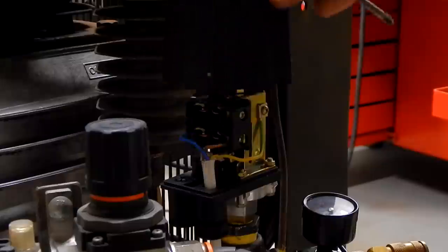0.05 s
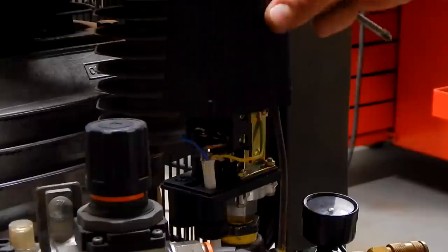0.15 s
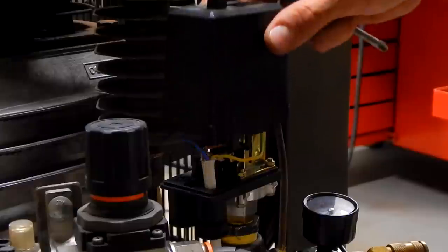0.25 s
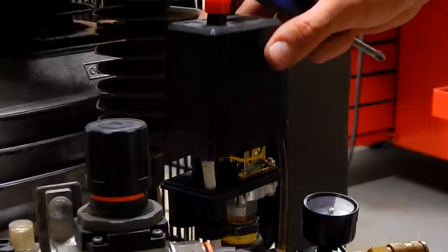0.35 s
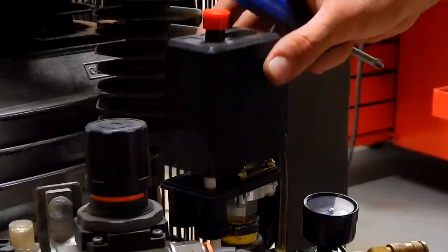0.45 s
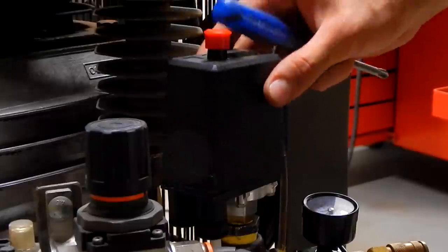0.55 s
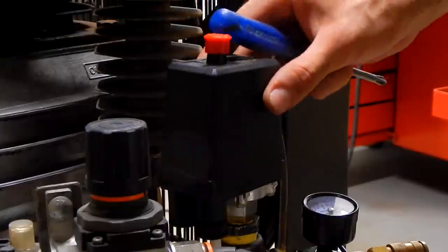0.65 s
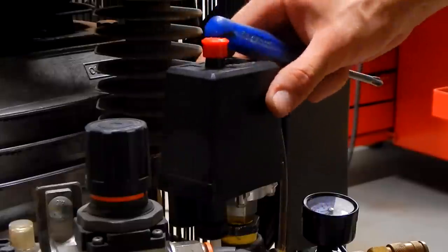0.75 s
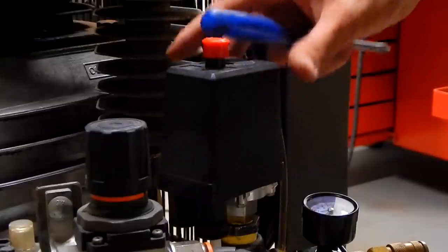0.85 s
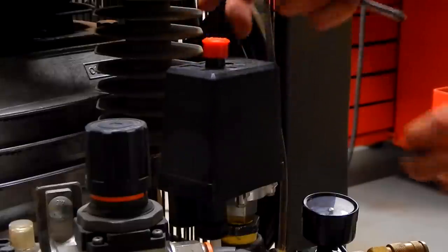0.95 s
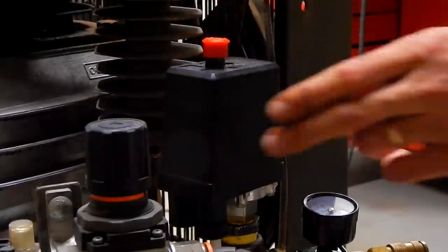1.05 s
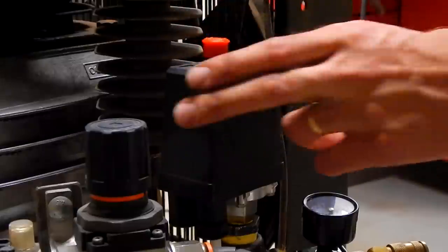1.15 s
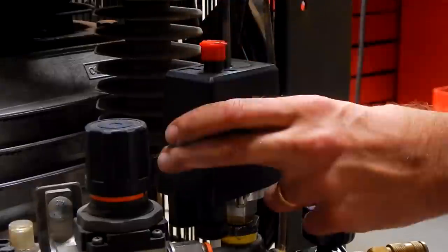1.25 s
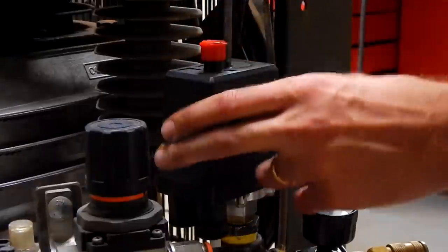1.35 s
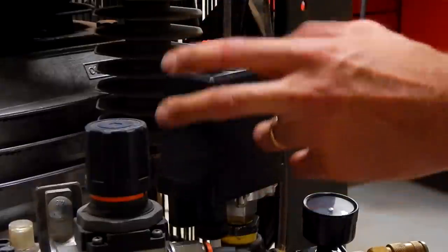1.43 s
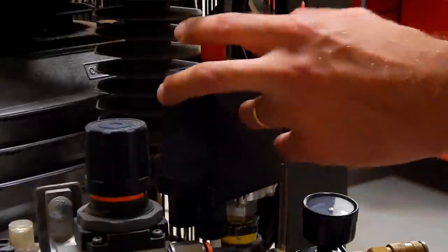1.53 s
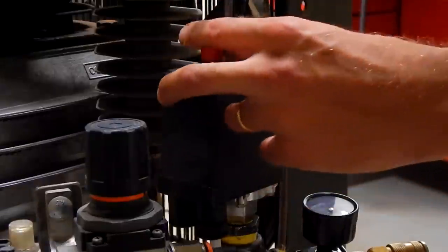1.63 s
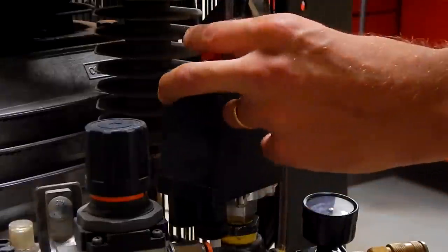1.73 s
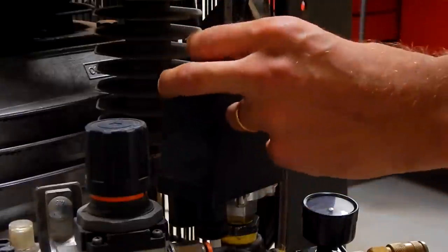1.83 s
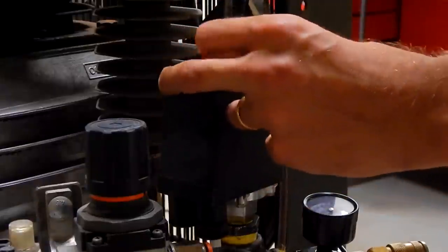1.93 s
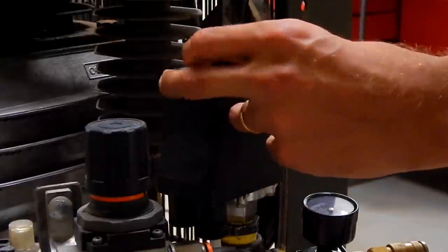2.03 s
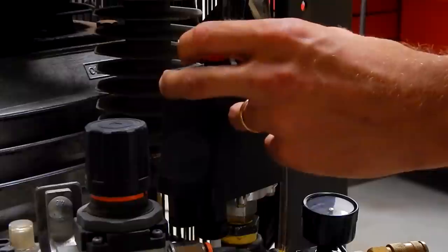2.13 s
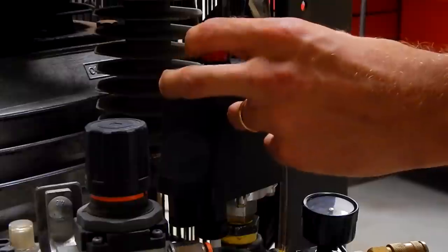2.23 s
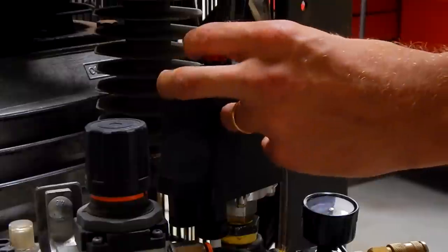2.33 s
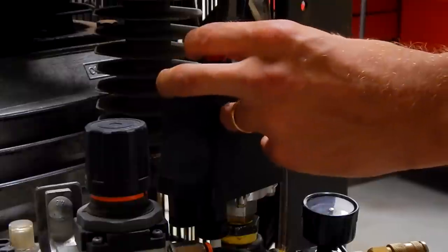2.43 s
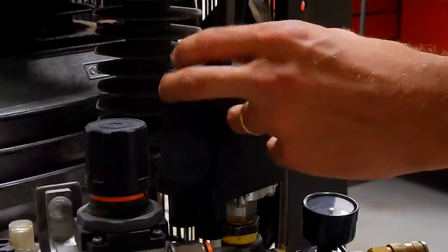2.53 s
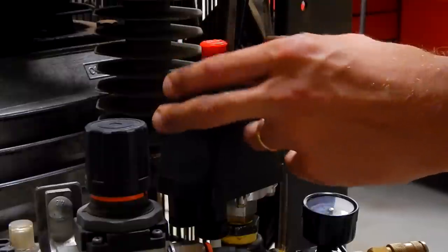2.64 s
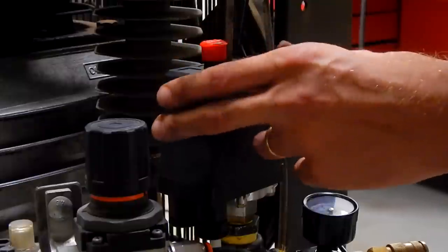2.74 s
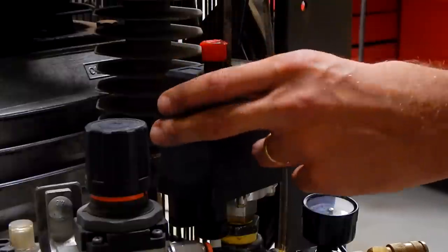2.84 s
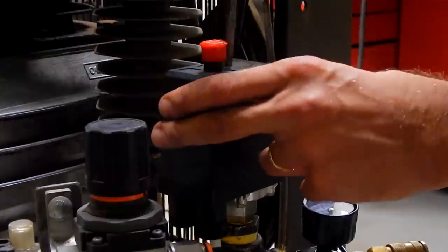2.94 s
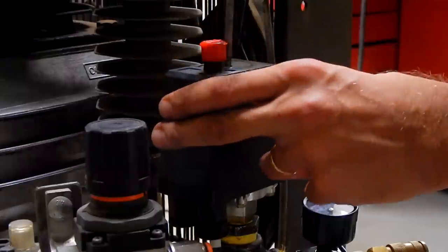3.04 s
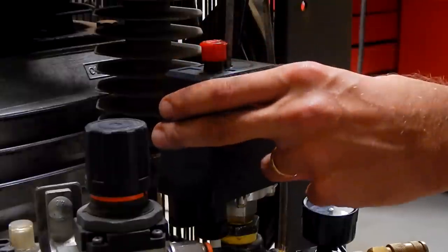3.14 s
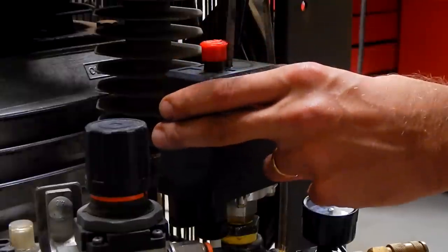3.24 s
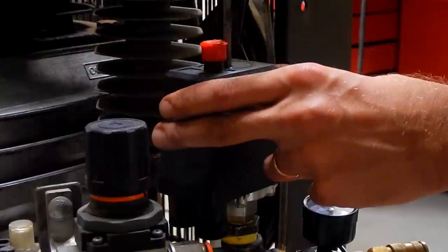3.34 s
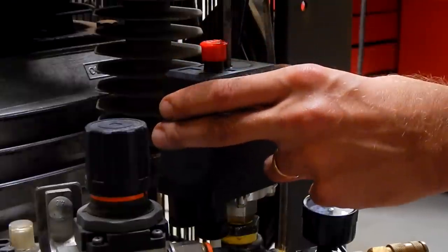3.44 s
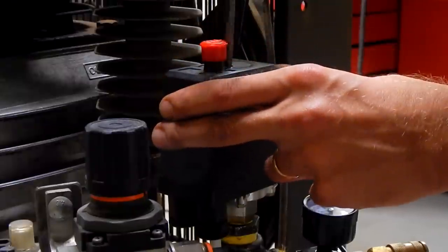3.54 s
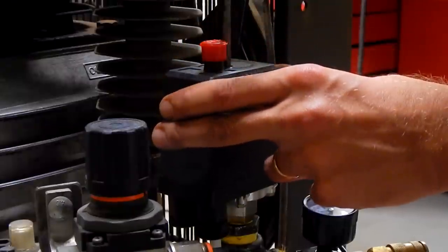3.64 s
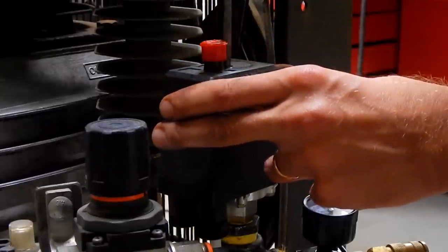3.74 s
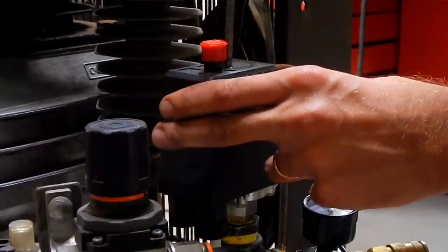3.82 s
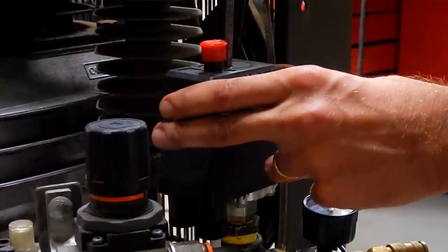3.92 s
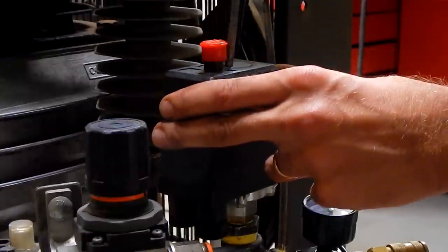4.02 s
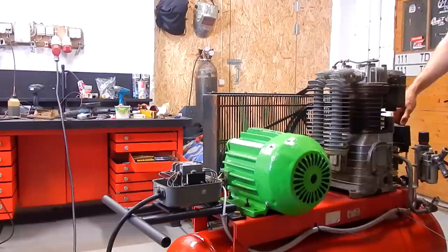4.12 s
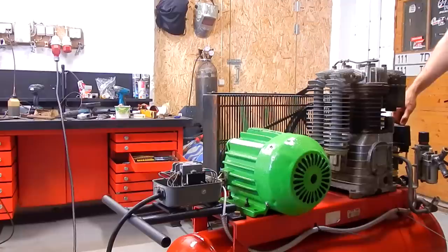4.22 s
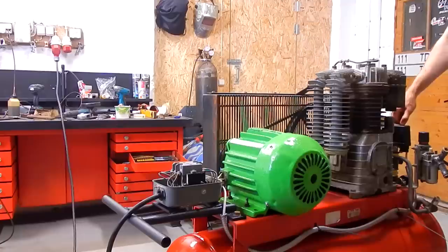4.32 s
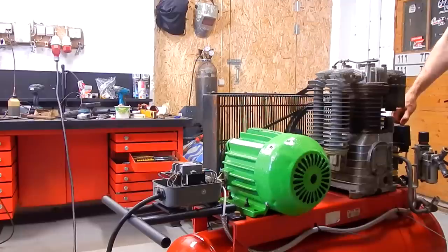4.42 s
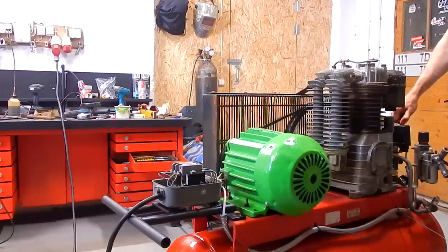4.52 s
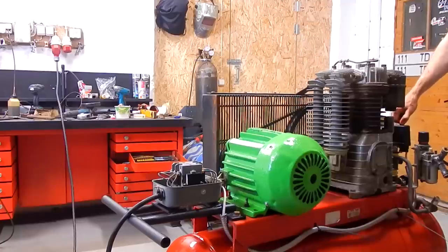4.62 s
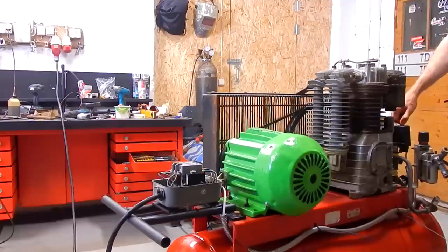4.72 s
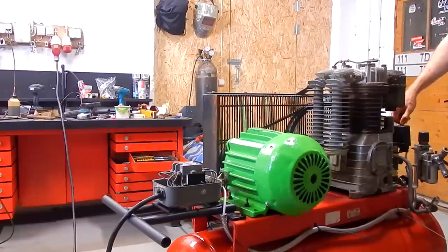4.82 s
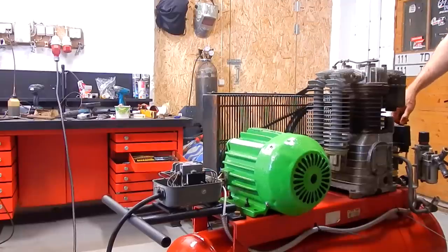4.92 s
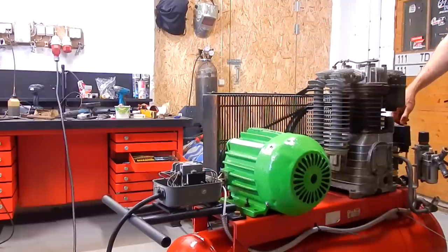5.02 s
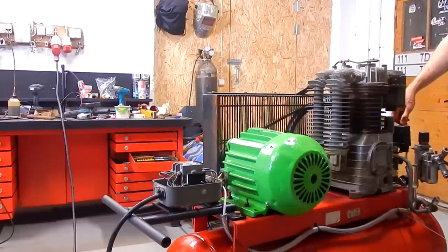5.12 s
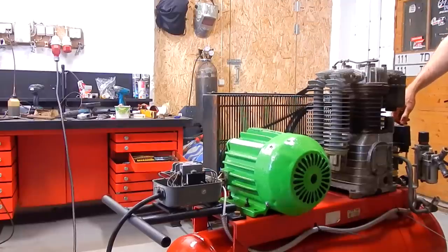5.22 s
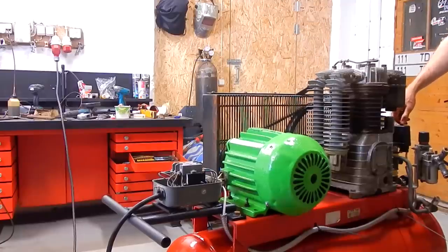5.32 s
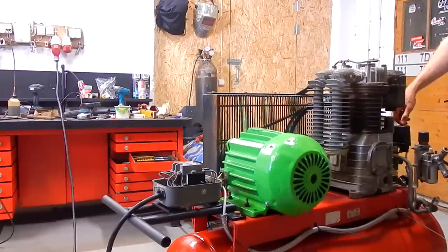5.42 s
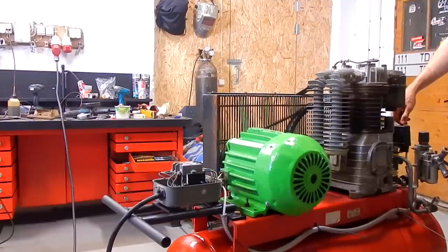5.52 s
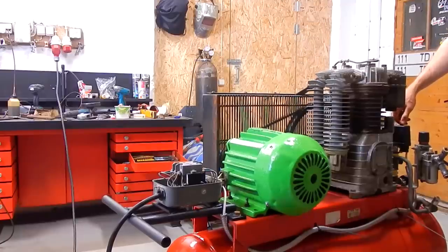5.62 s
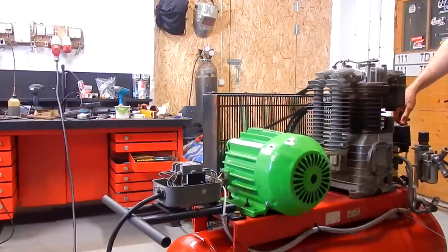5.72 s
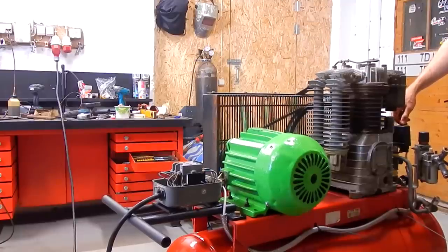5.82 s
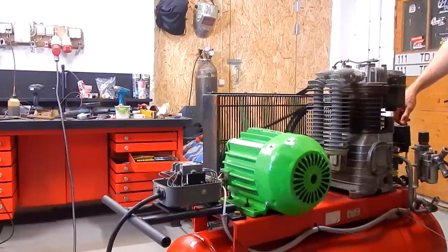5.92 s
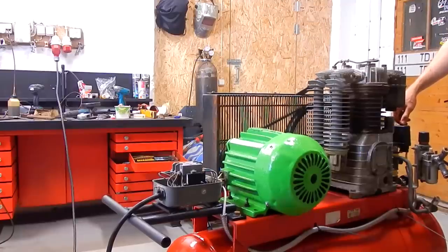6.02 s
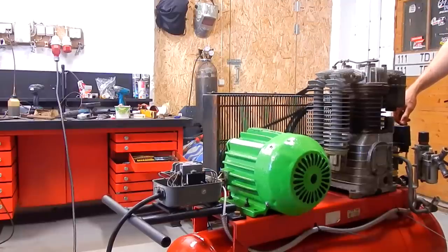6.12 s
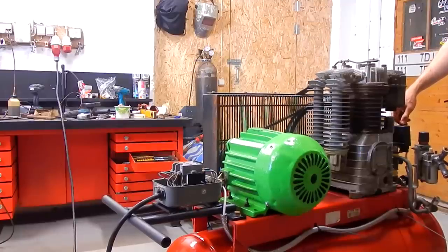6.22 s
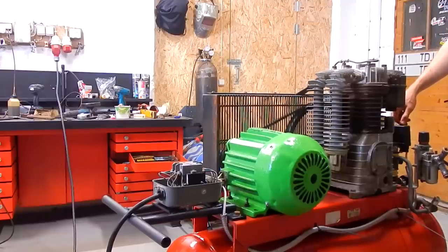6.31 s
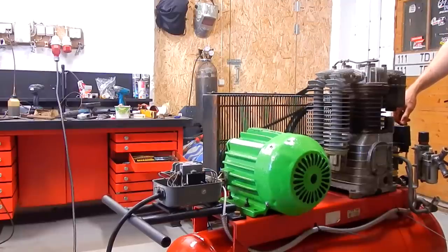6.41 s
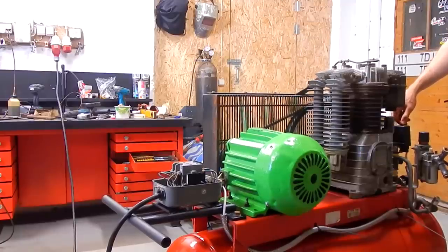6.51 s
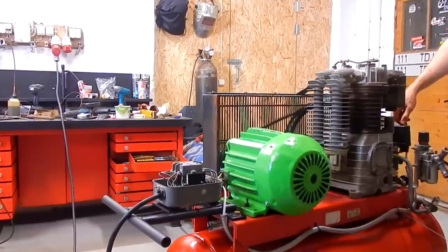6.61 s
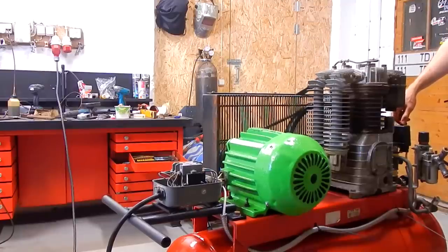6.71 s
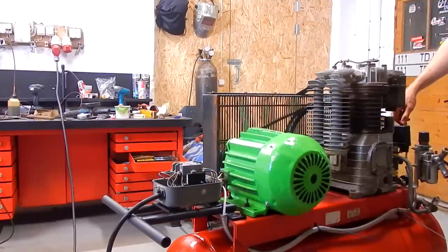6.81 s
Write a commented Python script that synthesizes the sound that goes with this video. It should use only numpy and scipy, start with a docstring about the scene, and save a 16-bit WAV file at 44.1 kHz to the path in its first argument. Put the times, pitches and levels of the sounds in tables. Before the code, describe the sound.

Over a faint workshop background, a hand fits a plastic cover close to the microphone, with a cluster of light taps and rubbing from about 0.3 to 0.9 seconds. Much fainter touches and skin rustle follow until about 4 seconds, with one slightly clearer tap at 3.6. At about 4.2 seconds a short, soft puff of air fades over a faint pipe hum. At 4.5 an electrical switch shuts with a sharp metallic clack and a short room echo. An electric air compressor immediately spins up with a rough, rising whine, a shudder, a brief belt chirp and a few quickening piston thuds. From about 5 seconds it runs at full speed in a loud, steady drone of throbbing tank, motor whine, rattling valves and bright rushing air, continuing to the end at around 7 seconds.

```python
"""A workshop. A hand fits a plastic cover on a pressure switch: rubbing skin and small taps ring the cover's
modes. Then the scene changes: further off, escaping air dies away over a humming pipe and a contactor clacks
shut. A belt-driven piston compressor spins up, shuddering and thudding, then settles into a drone of throbbing
tank, motor whine, valve rattle and rushing air. Two close microphone ports hear it."""
import sys
import numpy as np
from scipy import signal
from scipy.fft import rfft, irfft
from scipy.io import wavfile
from scipy.ndimage import uniform_filter1d

SR = 44100
rng = np.random.default_rng(int(sys.argv[2]) if len(sys.argv) > 2 else 0)


def unload_wav(signal):
    """Save mono or channel-first audio to the path in sys.argv[1] as 16-bit WAV at rate SR, clipped to [-1, 1]."""
    wavfile.write(
        sys.argv[1],
        SR,
        np.round(np.clip(np.atleast_2d(signal).T, -1, 1) * 32767).astype(np.int16),
    )


N = 302526
TIME = np.arange(N) / SR
SCENE_CHANGE_S, MOTOR_ON_S = 4.166, 4.5
STARTUP, RUN = slice(4 * SR, 5 * SR), slice(4 * SR, N)  # windows for the machine's sounds


def undb(db):
    """Decibels to amplitude."""
    return np.exp(np.asarray(db) * (np.log(10) / 20))

def unit(x, after_s=0):
    """Scale to rms 1 over the part after a given time."""
    return x / np.sqrt(np.mean(x[..., int(after_s * SR):] ** 2))

def curves(table, outside=None):
    """One automation curve per value column of (time, value, ..) rows."""
    times, *columns = np.transpose(table)
    after = outside if times[-1] < TIME[-SR // 10] else None
    return [np.interp(TIME, times, column, outside, after) for column in columns]

def on_bins(table):
    """Spread (frequency, value) rows over the spectrum's bins."""
    hz, value = np.transpose(table)
    return np.interp(np.log(np.fft.rfftfreq(N, 1 / SR) + 1), np.log(hz), value)

def ring(x, hz, t60):
    """One decaying mode as a turning pointer; its imaginary part is the sound."""
    pole = np.exp(2j * np.pi * hz / SR - np.log(1000) / (t60 * SR))
    return signal.lfilter([1], [1, -pole], x)

def walk(rate):
    """Smooth random drift, `rate` new values a second, spread near 1."""
    hold, coarse = int(SR / 16 / rate), TIME[::16]
    held = np.repeat(rng.standard_normal(len(coarse) // hold + 1), hold)
    smooth = uniform_filter1d(uniform_filter1d(held, hold), hold)
    return np.interp(TIME, coarse, unit(smooth[:len(coarse)]))

def low_cut(x, hz):
    """Roll off the bass, which small parts do not radiate."""
    return signal.sosfilt(signal.butter(3, hz, "high", fs=SR, output="sos"), x)

# How alike the two ports sound: (frequency [Hz], correlation)
PORT_LIKENESS = [(60, 1), (130, 0.58), (290, 0.87), (640, 0.93), (1410, 0.56), (3100, 0.2), (6820, 0.066),
                 (15000, -0.07)]
def noise(colour, loop=0., loop_share=0.):
    """Coloured stereo noise, centred in the bass and wide in the treble; part of it may loop."""
    likeness = np.clip(on_bins(PORT_LIKENESS), -.9, .995)
    source = np.sqrt(1 - loop_share) * rng.standard_normal((2, N)) + np.sqrt(loop_share) * loop
    mid, side = rfft(source) * undb(on_bins(colour))
    mid, side = irfft(mid, N), irfft(side * np.sqrt((1 - likeness) / (1 + likeness)), N)
    return np.array([mid + side, mid - side]) / np.std(mid)


# Colour of the quiet workshop: (frequency [Hz], level [dB])
ROOM_COLOUR = [(15, -29), (25, -10), (44, -4.5), (86, -5), (411, -11), (497, -17), (785, -16), (1270, -14),
               (2500, -23), (4170, -23.5), (5030, -28), (10700, -34), (15600, -41)]
def room_tone(level_db=-62):
    """A low bed of noise that swells a little."""
    return undb(level_db + 1.2 * walk(3.14)) * noise(ROOM_COLOUR)

# Modes of the plastic cover: (frequency [Hz], level [dB])
COVER_MODES = [(250, -4.5), (390, -3.5), (460, -3), (550, 0), (640, -3), (790, 0), (880, -2.5), (1050, 4.5),
               (1250, 4), (1650, 0), (1950, -1), (2350, -0.5), (2700, -1), (3200, -1), (4400, 2)]
# Finger strokes: (peak time [s], rise [s], fade [s], rub level [dB], rustle level [dB], colour [Hz])
FINGER_RUBS = [(0.15, .25, 0.67, -62.5, -79, 520), (0.269, 0.017, 0.13, -43, -62, 595),
               (0.365, 0.02, 0.22, -39, -61, 754), (0.663, 0.025, 0.054, -36, -52, 775),
               (0.71, 0.084, 0.2, -35, -67, 410), (0.72, 0.054, 0.26, -41.5, -80, 265),
               (1.05, 0.2, 0.57, -61.5, -87, 457), (1.45, 0.055, 0.22, -60.5, -68, 785),
               (1.61, 0.018, 0.22, -60.5, -75, 590), (1.73, .04, 0.15, -59.5, -60.5, 696),
               (1.87, 0.071, 0.42, -60.5, -83, 570), (2.1, 0.21, 0.15, -62.5, -72, 322),
               (2.21, .06, .06, -61, -85, 300), (2.4, 0.11, 0.46, -62, -74, 580),
               (2.83, 0.33, 0.22, -60, -76, 560), (3.06, 0.053, 0.22, -58.5, -66.5, 600),
               (3.39, 0.093, 0.23, -57.5, -70, 530), (3.42, .06, 0.13, -55, -82, 370),
               (3.622, 0.0087, 0.25, -49, -65, 560), (3.64, 0.04, 0.12, -51, -80, 1130),
               (3.94, 0.052, 0.16, -58, -73, 1220), (4.15, 0.077, 0.017, -70, -86, 430)]
# Bed of rustle while the cover goes on: (time [s], level [dB])
SLEEVE_RUSTLE = [(0, -70), (.04, -64.5), (.24, -58), (.6, -66), (.83, -68), (.95, -88)]
def rubbing(hand_gone_s=4.2):
    """Stick-slip grains of skin ring the cover's modes; a finer, shorter rustle lies on top."""
    end = int(hand_gone_s * SR)
    peak_s, rise, fade, rub_db, rustle_db, colour_hz = np.transpose(FINGER_RUBS)[:, :, None]
    t = TIME[:end] - peak_s

    def power(db, fade_s):
        return undb(2 * db - 43.5 * np.maximum(-t / rise, t / fade_s))

    mode_hz, mode_db = np.transpose(COVER_MODES)
    db_per_octave = np.maximum(-0.9 * (rub_db + 26), 0)  # harder rubs reach more modes
    share = undb(2 * (mode_db - db_per_octave * np.abs(np.log2(mode_hz / colour_hz))))
    gains = np.sqrt((share / share.sum(axis=1, keepdims=True)).T @ power(rub_db, fade))
    grains = (noise([(100, -.1), (5000, -.1)]) * undb(2.7 * walk(45)))[:, :end]
    rub = sum(gain * unit(ring(grains, hz, t60=0.089 * (500 / hz) ** 1.55).imag)
              for gain, hz in zip(gains, mode_hz))
    skin = noise([(2500, -2), (4500, -7), (7000, -7), (10500, -3.5), (12500, -11), (15500, -28)])
    sleeve_power = undb(2 * curves(SLEEVE_RUSTLE, -120)[0][:end])
    rustle = skin[:, :end] * np.sqrt(power(rustle_db, 0.48 * fade).sum(axis=0) + sleeve_power)
    return np.pad(low_cut(rub, 192) + rustle, ((0, 0), (0, N - end)))

# Taps on the cover:
# (time [s], body level [dB], click level [dB], body colour [Hz], clack colour [Hz], clack gain [dB])
COVER_TAPS = [(0.26, -20, -34, 856, 2730, -2), (0.261, -29, -60, 1950, 1670, -1),
              (0.263, -34.5, -60, 410, 1670, -17), (0.322, -42, -60, 790, 2700, -18),
              (0.351, -18, -34, 800, 2760, -11.5), (0.355, -34, -60, 380, 1960, -20),
              (0.383, -31, -60, 1220, 1960, -7), (0.412, -29.5, -56, 796, 1580, -16),
              (0.433, -33, -60, 800, 1960, -25), (0.516, -29, -46, 850, 2380, -4),
              (0.578, -45, -58, 790, 2000, -15), (0.6, -42, -62, 790, 2000, -20),
              (0.659, -20.5, -34, 823, 2050, -11), (0.734, -31, -45, 789, 2200, 1),
              (0.742, -32, -54, 425, 2090, -16), (0.844, -39, -49.5, 388, 2020, 3),
              (1.429, -51, -48, 813, 1650, 7), (1.47, -49, -56, 1010, 1650, 10),
              (1.504, -42.5, -50, 950, 1660, 6), (1.6, -53, -54, 533, 1640, 4),
              (1.644, -58, -58, 540, 1590, -14), (1.715, -47, -48, 1320, 1640, 13),
              (1.919, -54, -51, 560, 1530, -3), (2.068, -52, -48, 467, 1750, 8),
              (2.36, -58, -65, 550, 1640, -20), (2.414, -52, -50, 1310, 1640, 0),
              (2.78, -52, -51, 560, 1600, 4), (2.82, -50, -62, 550, 1600, -20),
              (3.032, -55, -47, 363, 1530, 11), (3.372, -53, -49, 830, 1250, -6),
              (3.536, -55, -53, 546, 1650, -3), (3.612, -37.5, -37.5, 593, 1680, -7),
              (3.624, -41, -60, 600, 1250, -6), (3.645, -43, -60, 550, 1250, -3),
              (3.859, -54, -50, 623, 1780, -20), (3.914, -50, -45.5, 820, 2270, 5)]
def taps(soft_db=-44.5):
    """Each tap clicks and rings the cover's modes nearest its body and clack colours."""
    out, t = np.zeros(N + SR), np.arange(SR // 4) / SR
    hz, mode_db = np.transpose(COVER_MODES)[:, :, None]
    for start_s, body_db, click_db, body_hz, clack_hz, clack_db in COVER_TAPS:
        near_body = undb(-55 * np.abs(np.log2(hz / body_hz)))
        near_clack = undb(clack_db - 31 * np.abs(np.log2(hz / clack_hz)))
        weight = (near_body + near_clack) * undb(mode_db + 1.2 * rng.standard_normal(hz.shape))
        softness = undb(soft_db - body_db)  # light touches land more gently and last longer
        attack = 1 - np.exp(-t / (0.0018 * softness))
        stretch = 1 + softness ** .5
        t60 = 0.022 * stretch * (800 / hz) ** 0.54  # higher modes die sooner
        envelope = attack * undb(-60 * t / t60) * (1 - np.exp(-t * hz / 1.04))
        body = np.sum(weight * envelope * np.sin(2 * np.pi * (hz * t + rng.random(hz.shape))), axis=0)
        click = uniform_filter1d(low_cut(rng.standard_normal(len(t)), 1800), size=3)
        click *= attack * undb(-60 * t / stretch / 0.023) * (1 - np.exp(-t / 0.00044))
        i = int(start_s * SR)
        out[i:i + len(t)] += undb(body_db) * body / np.abs(body).max() + undb(click_db) * click
    return low_cut(out[:N], 230)

# Thin, high hisses near the hand: (start [s], end [s], pitch [Hz], nominal width [Hz], level [dB])
HISS_BANDS = [(1.244, 1.28, 9600, 500, -77), (1.341, 1.953, 9600, 700, -76), (1.398, 1.95, 10400, 400, -87),
              (1.92, 2.068, 11400, 1500, -72), (4.08, 4.146, 12500, 1500, -74)]
def hisses():
    """Narrow bands of noise fade in and out."""
    out = np.zeros((2, N))
    for start, end, hz, width, db in HISS_BANDS:
        part = slice(int((start - .02) * SR), int((end + .02) * SR))
        band = ring(ring(rng.standard_normal((2, SR)), hz, 2 / width), hz, 2 / width).imag
        fade = np.interp(TIME[part], [start - .02, start, end, end + 0.018], [0, 1, 1, 0])
        out[:, part] += undb(db) * fade * unit(band[:, :len(fade)])
    return out

# Colour of the escaping air: (frequency [Hz], level [dB])
PUFF_COLOUR = [(71, -60), (120, -42), (188, -2.5), (390, -15.5), (450, -4), (563, -21), (1460, -12),
               (9510, -24.5), (15500, -36)]
# Swells and dips of the pipe's hum: (time [s], level [dB])
PIPE_SWELLS = [(4.164, -53), (4.176, -47), (4.23, -60), (4.288, -49), (4.314, -51), (4.34, -48),
               (4.364, -49), (4.382, -61), (4.406, -44), (4.47, -47.5), (4.5, -55)]
def air_bleed(hold_s=0.099, fade_db_per_s=116, pipe_hz=466, overtone_hz=800):
    """Escaping air, already flowing as the scene changes, holds, then fades; a pipe hums on, wavering, until
    the motor starts."""
    def tone(hz):
        return np.sqrt(2) * np.sin(2 * np.pi * np.cumsum(hz + 5 * walk(34)) / SR)

    t = TIME - SCENE_CHANGE_S
    hum = tone(pipe_hz) + undb(-23 + 3 * walk(30)) * tone(overtone_hz)
    hum *= undb(curves(PIPE_SWELLS, -120)[0])
    rumble = undb(-57 - 14 * t) * unit(ring(rng.standard_normal(N), hz=227, t60=0.084).imag)
    puff = undb(-46.5 - fade_db_per_s * np.maximum(t - hold_s, 0)) * noise(PUFF_COLOUR)
    return (t > 0) * (puff + (TIME < MOTOR_ON_S) * (hum + rumble))

# The contactor closes and bounces: (time [s], crack level [dB], tick level [dB])
CONTACTOR_HITS = [(4.498, -21, -40), (4.511, -26, -15), (4.5205, -33, -18)]
# Colour of the crack: (frequency [Hz], level [dB])
CRACK_COLOUR = [(120, -47), (200, -15.5), (525, -7), (1130, -9.5), (1350, -13), (1510, -11), (1780, -2.5),
                (3960, -14), (6710, -13), (12700, -16.5), (15500, -34)]
# Modes of the armature: (frequency [Hz], gain [dB], t60 [s])
ARMATURE_MODES = [(546, -46, .1), (1254, -60, 0.074), (1731, -40.5, 0.11), (2126, -44.5, 0.064),
                  (2650, -44, 0.063), (3120, -59, 0.047), (4290, -47, .05)]
# Bright modes of the contacts: (frequency [Hz], gain [dB], t60 [s])
CONTACT_MODES = [(6950, -24, .012), (7960, -25, .012), (10600, -18, .01), (13000, -16.5, .008)]
def contactor():
    """Metal cracks ring the armature, bounces tick on the contacts and the housing rattles out."""
    crack_envelope = tick_envelope = 0
    for start_s, crack_db, tick_db in CONTACTOR_HITS:
        t = np.maximum(TIME - start_s, 0)
        snap_and_tail = undb(-60 * t / 0.08) + undb(-16.5 - 60 * t / 0.64)
        crack_envelope += undb(crack_db) * (1 - np.exp(-t / 0.00093)) * snap_and_tail
        tick_envelope += undb(tick_db - 60 * t / .02) * (1 - np.exp(-t / .001))
    crack = crack_envelope * noise(CRACK_COLOUR)
    tick = tick_envelope[STARTUP] * rng.standard_normal((2, SR))
    for drive, modes in (crack[:, STARTUP], ARMATURE_MODES), (tick, CONTACT_MODES):
        crack[:, STARTUP] += sum(undb(db) * ring(drive, hz, t60).imag for hz, db, t60 in modes)
    return crack

# The motor's run-up: (time [s], speed [share of full])
MOTOR_SPEED = [(4.5, 0.051), (4.62, 0.58), (4.7, 0.81), (4.77, 0.93), (4.86, 1), (5.0, 1)]
# The pump builds with speed and pressure: (time [s], rattle level [dB], air rush level [dB])
PUMP_LEVELS = [(4.52, -51, -52), (4.58, -32.5, -56), (4.63, -31, -47.5), (4.86, -28.5, -41.5),
               (5.07, -24, -37), (5.59, -22, -35.5), (6.86, -21.5, -32)]
# Motor and fan tones at full speed and pressure: (frequency [Hz], level [dB])
MOTOR_TONES = [(527.6, -33.5), (586.8, -39.5), (619.1, -44.5), (662.1, -39), (786.0, -43.5), (904.4, -49),
               (979.8, -39.5), (1028, -39), (1061, -38.5), (1297, -43), (1680, -44), (1782, -49),
               (2040, -49), (2336, -50.5)]
def motor_whine(strain_hz=1000, chirp_hz=1850):
    """Tones glide up with the motor; it whines roughly under strain and the belt chirps as it bites."""
    speed = curves(MOTOR_SPEED)[0]
    angle = 2 * np.pi * np.cumsum(speed) / SR
    whine = sum(undb(db + 3.1 * walk(9)) * np.sqrt(2) * np.sin(hz * angle + 1.12 * walk(11))
                for hz, db in MOTOR_TONES)
    whine *= speed ** 4 * undb(curves(PUMP_LEVELS, -120)[0] - PUMP_LEVELS[-1][1])
    strain = np.interp(TIME, [4.55, 4.62, 4.85, 5.0], [0, 1, 1, 0]) * undb(-36 + 3 * walk(45))
    bite = np.exp(-.5 * ((TIME - 4.79) / 0.065) ** 2) * undb(-35 + 4.9 * walk(62))
    whine += strain * np.sin(strain_hz * angle + 1.85 * walk(150))
    return whine + bite * np.sin(chirp_hz * angle + 2.2 * walk(220))

# Colour of the valve rattle: (frequency [Hz], level [dB])
RATTLE_COLOUR = [(120, -45), (240, -26), (400, 1.5), (445, -3), (527, -2.5), (701, -7.5), (896, -10.5),
                 (999, -10.5), (1130, -6), (1330, -7.5), (1410, -16), (1650, -10.5), (2470, -14),
                 (2670, -17), (3450, -19.5), (4200, -37), (5460, -57), (9240, -120)]
# Casing modes: (frequency [Hz], nominal width [Hz], gain [dB], pitch climb [Hz], climb time [s])
CASING_MODES = [(516, 26, 1.5, -1, 6.15), (987, 71, -6.5, 0.5, 6), (1328, 12, -8, -0.5, 5.94),
                (1590, 290, -9, 0.5, 6), (2591, 55, -7.5, 80.5, 6.05), (3068, 88, -11, 9.5, 6),
                (3370, 24, -4, 88, 5.58), (5465, 143, -17, -0.5, 6)]
def valve_rattle(motor_turn_hz=16.33, climb_s=0.078):
    """Valves rattle, partly repeating each motor turn; the casing sings out once up to speed."""
    grit = (noise([(300, -.1), (8000, -.1)]) * undb(0.5 * walk(60)))[:, RUN]
    casing = 0
    for hz, width, db, climb_hz, at_s in CASING_MODES:
        shift_hz = climb_hz * (1 + np.tanh((TIME[RUN] - at_s) / climb_s)) / 2
        climb = np.exp(2j * np.pi * np.cumsum(shift_hz) / SR)  # tank pressure stiffens the valves
        casing += undb(db) * np.sqrt(width) * unit((ring(grit, hz, 2.9 / width) * climb).imag)
    casing = np.pad(unit(casing), ((0, 0), (RUN.start, 0)))
    casing *= undb(np.interp(TIME, [4.8, 5.2], [-10.4, -5]))
    one_turn = rng.standard_normal((2, int(SR / motor_turn_hz)))
    position = np.round(np.cumsum(curves(MOTOR_SPEED)[0])).astype(int) % one_turn.shape[1]
    rattle = noise(RATTLE_COLOUR, one_turn[:, position], loop_share=.3) * undb(1.5 + 0.9 * walk(30))
    return undb(curves(PUMP_LEVELS, -120)[0]) * (rattle + casing)

# Colour of the air on the fins: (frequency [Hz], level [dB])
RUSH_COLOUR = [(2180, -6.5), (3700, -1.5), (3950, -8), (4330, 0), (4970, -1), (5410, -1), (7570, -5),
               (10800, -4.5), (14400, -18), (15600, -26)]
def air_rush():
    """Air rushes over the fins in a bright, fluttering wash."""
    rush_db = curves(PUMP_LEVELS, -120)[1]
    return noise(RUSH_COLOUR) * undb(rush_db + 0.36 * walk(70) + 0.29 * walk(12))

# Swells of the frame's tones: (peak time [s], frequency [Hz], level [dB], spread [s])
FRAME_SWELLS = [(4.602, 365, -23.5, 0.018), (4.635, 390, -16, 0.013), (4.63, 580, -27.5, 0.019),
                (4.664, 670, -24, 0.0034), (4.683, 197, -20, 0.014), (4.695, 840, -26, 0.0051),
                (4.596, 1150, -32.5, 0.01), (4.63, 1150, -30.5, 0.01), (4.663, 430, -20, 0.0069),
                (4.658, 180, -27, 0.008), (4.7, 460, -25.5, 0.019), (4.723, 380, -22, 0.004),
                (4.742, 410, -19, 0.013), (4.75, 195, -27.5, 0.015)]
def frame_shudders():
    """The frame rings up in short, fluttering swells as the motor pulls through its resonances."""
    out, t = np.zeros(N), TIME[STARTUP]
    flutter_db, waver = 2.5 * walk(150)[STARTUP], .5 * walk(120)[STARTUP]
    for peak_s, hz, db, spread_s in FRAME_SWELLS:
        swell = undb(db + flutter_db) * np.exp(-.5 * ((t - peak_s) / spread_s) ** 2)
        out[STARTUP] += swell * np.sin(2 * np.pi * hz * t + waver)
    return out

# The belt slips, so the crank lags the motor: (time [s], speed [turns/s])
CRANK_SPEED = [(4.5, 1.0), (4.72, 8.5), (4.82, 11.6), (4.9, 13.3), (4.98, 14.1), (5.12, 14.33),
               (6.9, 14.34)]
# Tank and intake modes: (order [multiple of the full crank rate], level [dB])
TANK_MODES = [(4, -26), (5, -18), (6, -34), (7, -25), (8, -17), (9, -19), (10, -20), (11, -11), (12, -9),
              (13, -1), (14, -2), (15, -2), (16, -16), (17, -5), (18, 0), (19, -21), (20, -8), (21, -5),
              (22, -10), (23, -19), (24, -3), (25, -8), (26, -3), (27, -11), (28, -6), (29, -15), (30, -19),
              (32, -20), (33, -20), (34, -13), (35, -18)]
def tank_throb(level_db=-18.5, first_stroke_s=4.77, crank_hz=14.34, t60=.26, knock_order=19):
    """One stroke a turn rings tank and intake, sweeping down from a knock to a low boom."""
    turns = np.cumsum(curves(CRANK_SPEED)[0]) / SR
    turns -= turns[int(first_stroke_s * SR)]
    strokes = np.diff(np.floor(np.maximum(turns, -.5)), prepend=-1) * undb(0.38 * walk(25))
    turbulence = undb(-49) * rng.standard_normal(N)
    push = (strokes + turbulence)[RUN]
    throb = np.zeros((2, N))
    for order, db in TANK_MODES:
        hz = order * crank_hz
        mode = ring(ring(push, hz, t60), hz, t60)  # swells in through its coupling
        below, above = max(knock_order - order, 0), max(order - knock_order, 0)
        lag_cycles = .08 * order - .035 * below ** 2 + .01 * above ** 2 + .025 * rng.standard_normal()
        if below:  # the second cylinder booms half a turn later, a quarter cycle out of step
            mode *= (1 - 1j * (-1) ** order) / np.sqrt(2)
        if order < 12:  # the lowest modes come in late
            mode *= np.clip((TIME[RUN] - 4.73) / 0.33, 0, 1)
        ports = 1 + 0.044 * np.exp(2j * np.pi * rng.random()) * np.array([[1], [-1]])
        throb[:, RUN] += undb(db) * np.imag(ports * mode * np.exp(-2j * np.pi * lag_cycles))
    fade_in = np.clip((TIME - 4.6) / 0.15, 0, 1) ** 2
    return undb(level_db) * fade_in * unit(throb, after_s=6.7)

# First piston strokes: (time [s], level [dB])
EARLY_STROKES = [(4.778, -26), (4.865, -28), (4.939, -18.5), (5.012, -16)]
# Modes of the cylinder head: (frequency [Hz], gain [dB], t60 [s])
HEAD_MODES = [(206, -9, 0.29), (289, 2, 0.16), (387, -15, 0.057)]
def piston_thuds():
    """The first strokes push the cylinder head and thud one by one before the drone closes up."""
    push, start = np.zeros(SR), int(MOTOR_ON_S * SR)
    for at_s, db in EARLY_STROKES:
        push[int((at_s - MOTOR_ON_S) * SR)] = undb(db)
    push = uniform_filter1d(push, size=40)
    head = sum(undb(db) * ring(push, hz, t60).imag for hz, db, t60 in HEAD_MODES)
    return np.pad(low_cut(head, 143), (start, N - SR - start))


def scene(room_t60_s=0.44, echo_db=-11.5):
    """Mix the layers; taps and clacks echo off the walls, a little differently into each port."""
    t = TIME[:SR]
    tails = rng.standard_normal((3, SR)) * undb(-60 * t / room_t60_s) * (t > .002)
    shared, left, right = signal.lfilter([1], [1, -.85], tails)  # darkens the echo
    room = np.array([2.4 * shared + left, 2.3 * shared + right])
    hits = taps() + contactor()
    echo = undb(echo_db) * signal.fftconvolve(hits, room / np.linalg.norm(room[0]), axes=1)[:, :N]
    lead_in = rubbing() + hisses() + air_bleed()
    jolts = frame_shudders() + piston_thuds()
    drone = tank_throb() + motor_whine() + valve_rattle() + air_rush()
    return hits + echo + lead_in + jolts + drone + room_tone()

# Balance of the ports: (frequency [Hz], left minus right [dB])
PORT_BALANCE = [(60, -6), (110, 2.5), (200, 0.5), (380, 0), (700, 0.5), (1290, -2.5), (2380, -4),
                (4400, -2), (8120, -4), (15000, -3.5)]
def record(dry, notch_hz=2500, top_hz=15746):
    """The right port is brighter; the camera cuts rumble, notches a tone's multiples and cuts the top."""
    lean = undb(on_bins(PORT_BALANCE) / 2)
    mix = low_cut(irfft(rfft(dry) * np.array([lean, 1 / lean]), N), 54)
    for k, width_hz in enumerate((110, 70, 90, 60), start=1):
        notch = signal.iirnotch(k * notch_hz, k * notch_hz / width_hz, SR)
        mix = .15 * mix + .85 * signal.lfilter(*notch, mix)
    return signal.sosfilt(signal.ellip(10, .2, 70, top_hz, fs=SR, output="sos"), mix)


dry = scene()
out = record(dry)
unload_wav(out)
```